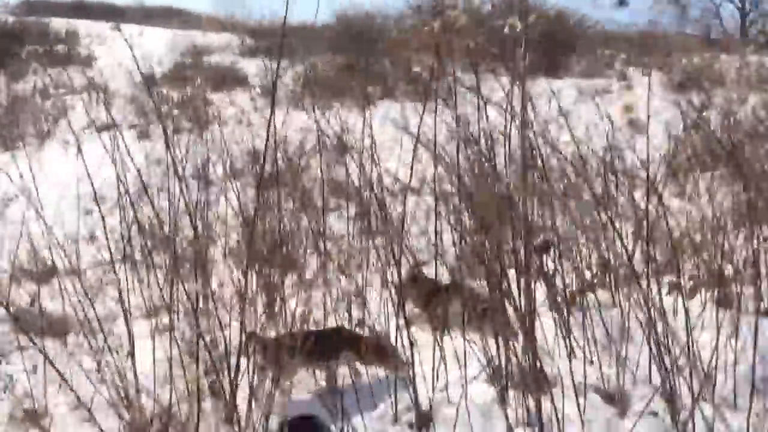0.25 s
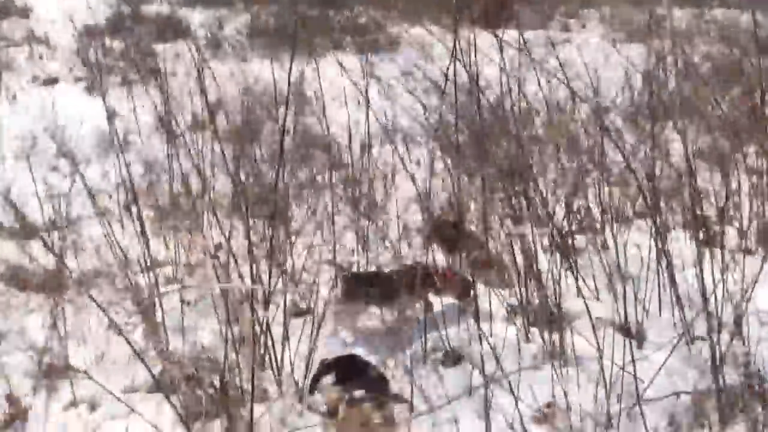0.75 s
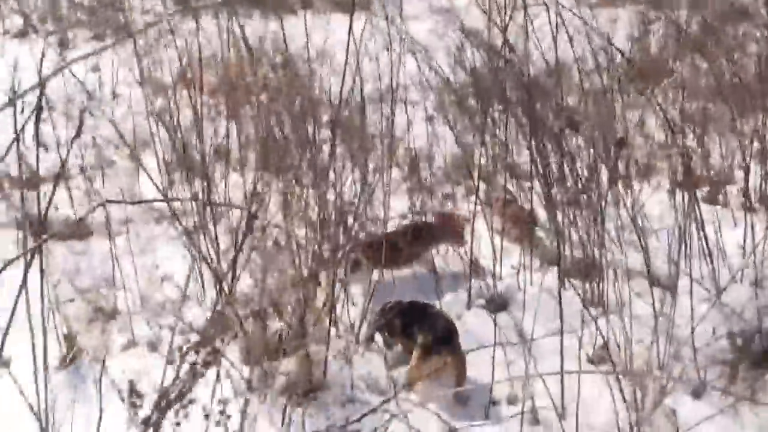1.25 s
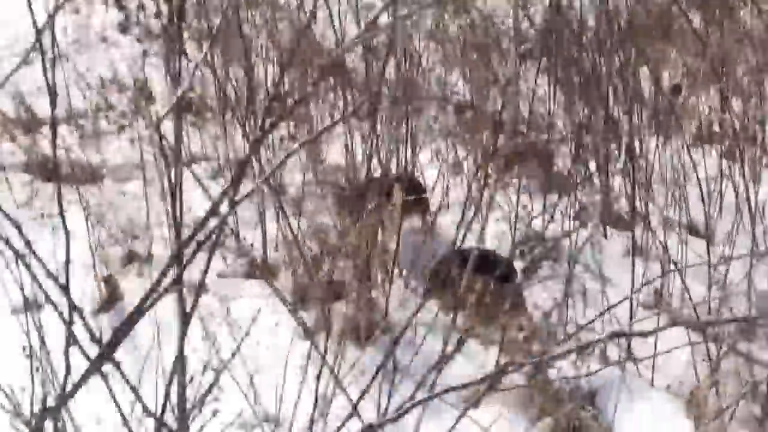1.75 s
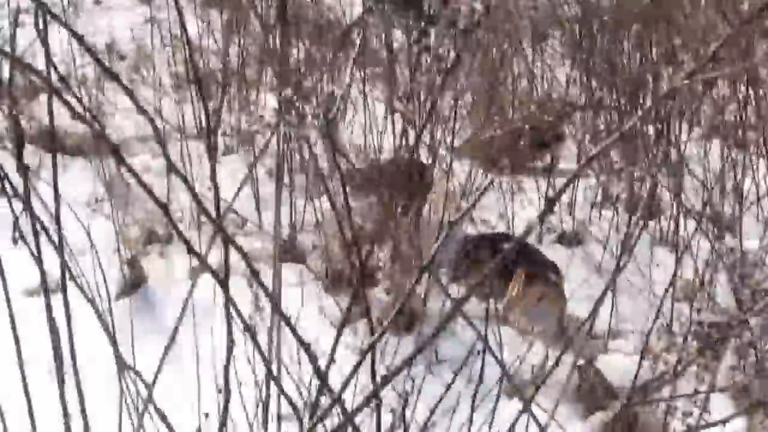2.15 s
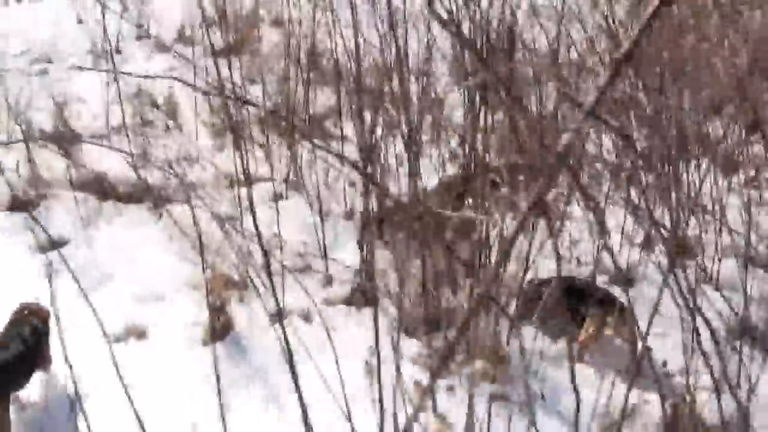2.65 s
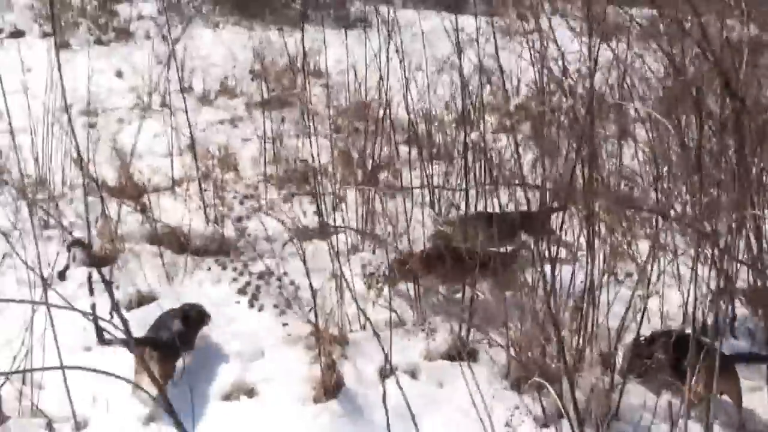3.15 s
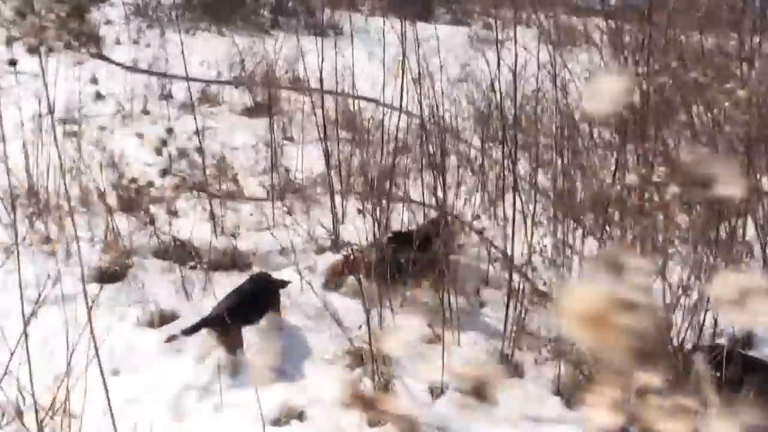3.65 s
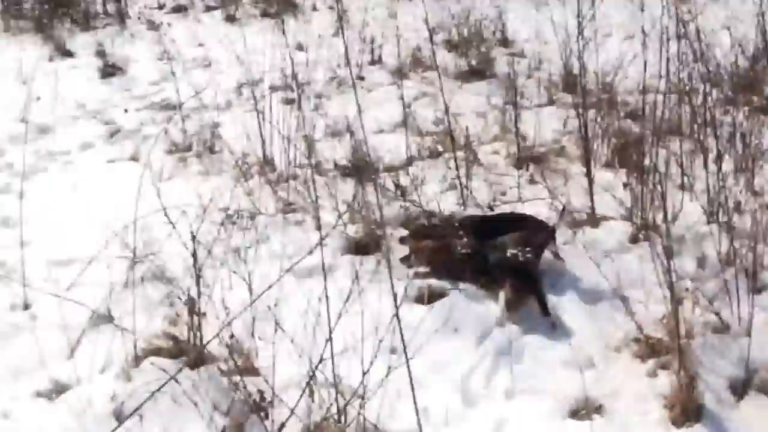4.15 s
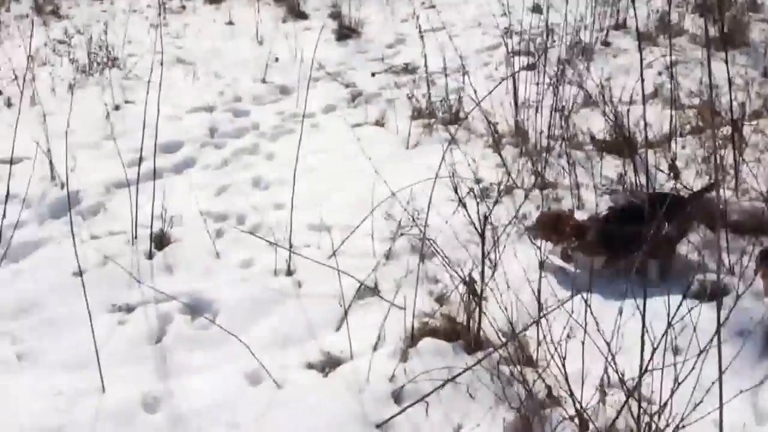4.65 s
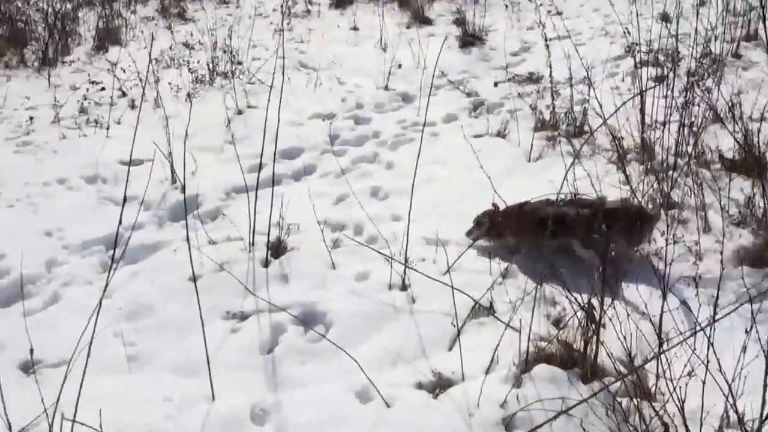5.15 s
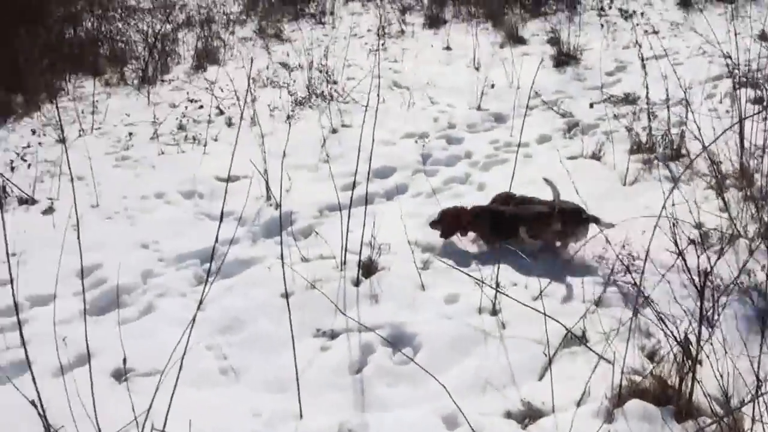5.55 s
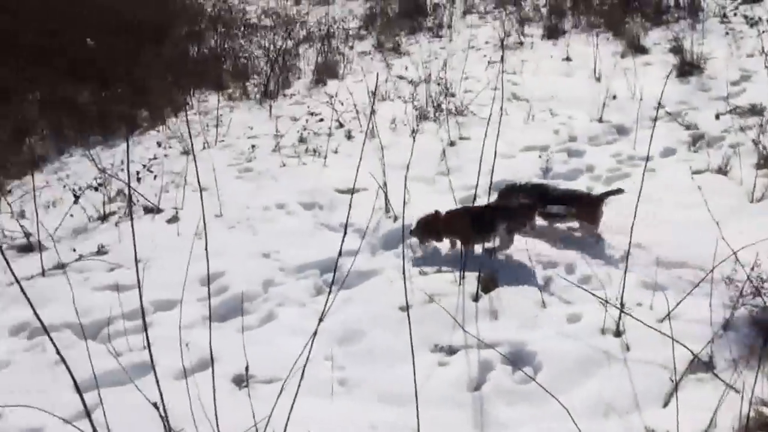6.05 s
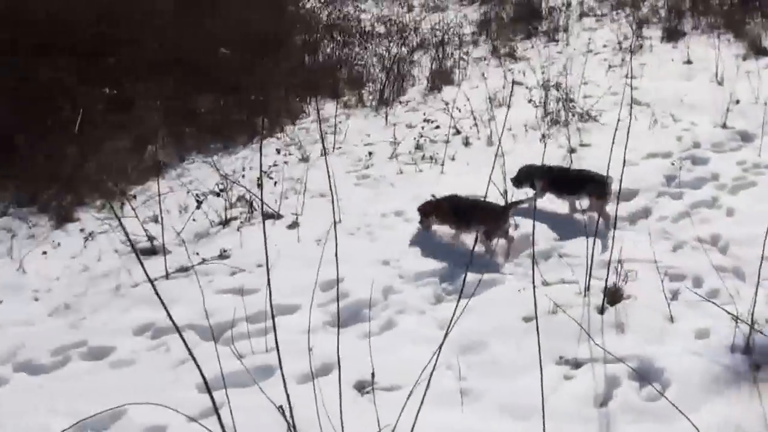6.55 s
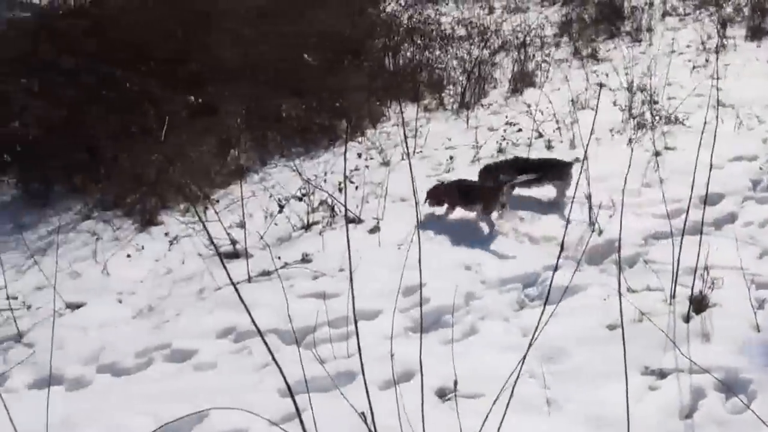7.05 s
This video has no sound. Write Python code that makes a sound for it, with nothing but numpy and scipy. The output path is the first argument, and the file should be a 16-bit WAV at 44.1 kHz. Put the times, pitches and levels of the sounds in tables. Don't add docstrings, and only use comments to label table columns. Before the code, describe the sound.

An outdoor field capture with a handheld stereo microphone: wind rumble and crackling dry stems first, then a pack of hounds baying close by. Clear ringing bays alternate with deep barks, high yelps and rough, rasping chops, pausing briefly between bursts. Sharp twig ticks and a soft knock on the microphone housing occur among them. Later cries come faster and overlap, with almost no echo, ending abruptly mid-bay.

```python
import sys
import numpy as np
from scipy import signal
from scipy.fft import rfft, irfft, next_fast_len
from scipy.io import wavfile
from scipy.ndimage import uniform_filter1d, minimum_filter1d

SR = 44100
rng = np.random.default_rng(int(sys.argv[2]) if len(sys.argv) > 2 else 0)


def to_wav(s):
    ch = np.atleast_2d(s).T
    pcm = np.round(np.clip(ch, -1, 1) * 32767)
    wavfile.write(sys.argv[1], SR, pcm.astype(np.int16))


def boost(x):
    u = np.asarray(x, float) / 20
    return 10 ** u


N = 322371

# f/Hz, level/dB per Hz
WIND_COLOUR = [(12, -36), (20, -6), (125, 0), (332, -9.5), (374, -12), (536, -15), (782, -22), (1200, -28),
               (1560, -28), (2640, -120)]
# t/s, level/dB
WIND_FORCE = [(0, -41.5), (.2, -37.5), (.7, -40), (.85, -31.5), (1.1, -33.5), (1.46, -47.5), (1.79, -41),
              (2.25, -48), (2.42, -40), (2.8, -42.5), (2.9, -52), (4.45, -37), (4.72, -59), (5.2, -55),
              (5.6, -61), (6.14, -55), (6.27, -45), (7.31, -62)]
# f/Hz, level/dB per Hz
RUSTLE_COLOUR = [(200, -6.5), (600, 0), (1500, -1), (3000, -5), (6000, -8), (8000, -10.5), (11500, -8),
                 (15500, -19.5)]
# t/s, level/dB
STEM_STIR = [(0, -48), (.2, -51.5), (.33, -44), (.7, -53.5), (.85, -48.5), (1.1, -46), (1.48, -56),
             (2.25, -59.5), (2.39, -50), (2.78, -56), (2.9, -51.5), (3.3, -55), (4.2, -46.5), (4.71, -55),
             (4.82, -47), (4.97, -54.5), (5.8, -58.5), (7.31, -61.5)]
# t/s, length/s, low f/Hz, high f/Hz, level/dB
SNORTS = [
    (0.099, 0.039, 1040, 2160, -43.5),
    (1.09, 0.11, 880, 5450, -44),
    (2.94, 0.072, 680, 5300, -42.5),
    (4.749, 0.13, 149, 1200, -43),
]

# t/s, f/Hz, effort level/dB
BAYS = [
    [(1.195, 522, -52), (1.225, 590, -26.5), (1.26, 617, -21), (1.34, 626.5, -20.5), (1.388, 675, -24),
     (1.42, 535, -56)],
    [(2.678, 622, -35.5), (2.71, 649, -24.5), (2.8, 631, -20), (2.82, 680, -32)],
    [(5.53, 612.3, -27), (5.57, 627.6, -23.5), (5.6, 595, -23), (5.65, 611.5, -27), (5.69, 676, -39)],
    [(6.022, 596, -57), (6.05, 625, -28), (6.17, 626, -27), (6.21, 649.7, -26), (6.33, 664.6, -28),
     (6.375, 708, -36.5)],
    [(6.773, 569.5, -39), (6.8, 636.4, -28), (6.85, 659, -21), (6.92, 673, -20.5), (6.945, 590, -45.5)],
    [(4.993, 480, -45), (5.012, 530, -39), (5.03, 570, -30), (5.055, 628, -27), (5.09, 605, -25),
     (5.128, 600, -24), (5.143, 520, -44)],
    [(7.25, 520, -50), (7.256, 580, -35), (7.265, 615, -32), (7.285, 610, -30), (7.305, 595, -30),
     (7.345, 595, -30)],
]
BAY_OVERTONES = (-2, 0.1, -6, -7.5, -26.5)
# brightness at start, end/dB per overtone, second overtone/dB, top overtones/dB,
# left minus right/dB
BAY_JAWS = [(1.5, .9, .5, -2.5, 6.5), (.6, .6, .3, -6, 1.5), (.9, .9, .3, .3, -5.5), (0, 2.6, 1.2, -3, -5),
            (.3, -7, -11, .3, -3.5), (.9, .9, 3, -2.5, -1.3), (1.5, -1.5, 8, 3, -6.5)]
# third at start, end/dB, fourth at start, end/dB, first gape/0-1
BAY_TONES = [(-1.5, -4, 3, 3, .9), (3, -8, .3, 6, .7), (.3, -6, 4, 2.5, .9), (.3, .3, -1.5, .3, .7),
             (-3, -4, -3, -4, .9), (11, -2.5, 9, -6, .1), (-5, -7, 5, -2.5, .1)]
# from t/s, to t/s, f/Hz, level/dB, hoarseness level/dB
RATTLES = [(1.249, 1.373, 790, -6, -50), (1.645, 1.688, 842, -9, -34), (1.802, 1.92, 780, -5.5, -12.5),
           (2.393, 2.49, 770, -18, -21), (4.208, 4.266, 800, -6, -14.5), (4.425, 4.54, 785, -7, -14),
           (4.841, 4.93, 770, -8, -20), (5.338, 5.41, 780, -3, -20), (5.598, 5.68, 770, -9, -19.5),
           (5.846, 5.92, 780, -12, -24), (5.987, 6.162, 815, -29, -21.5), (6.358, 6.441, 790, -13, -39),
           (6.811, 6.924, 790, -9.5, -24), (4.995, 5.038, 860, -4, -5), (7.296, 7.34, 880, -2, -20)]
# pitch share at the end, sideband level/dB
RATTLE_DRIFTS = [(1.01, .3), (1.01, .3), (1.01, 3), (1.01, .3), (1.01, .3), (1.01, -6), (1.12, 5),
                 (1.01, .3), (1.01, .3), (1.01, .3), (1.01, .3), (1.01, .3), (1.01, .3), (1.05, 6),
                 (1.01, .3)]
# f/Hz, level/dB
UPPER_THROAT = [(2800, -15), (3700, -27), (4300, -32), (4900, -25), (5500, -26), (6500, -33), (8000, -46.5),
                (10000, -42.5), (13000, -76)]
# f/Hz, left lead/rad
SIDE_LEAD = [(100, 5), (600, 0.86), (1200, 0.7), (2500, 0.67), (5400, 0.25), (11000, -0.5)]

# t/s, length/s, start f/Hz, end f/Hz, level/dB
SQUEAKS = [
    (1.404, 0.025, 6460, 7030, -38.5),
    (2.633, 0.049, 7000, 7000, -56),
    (5.515, 0.015, 6400, 6500, -42),
    (5.688, 0.036, 6270, 7200, -50.5),
]
# t/s, peak level/dB, f/Hz
SNAPS = [
    (1.4562, -46, 7030),
    (2.0122, -19.5, 10050),
    (3.2226, -38, 11400),
    (4.2961, -36, 10300),
    (5.465, -34, 11800),
    (5.4782, -28.5, 5930),
    (6.707, -24, 7660),
]

# t/s, f/Hz, effort level/dB
WAILS = [
    [(1.575, 650, -56), (1.6, 952, -50), (1.625, 1300, -41)],
    [(5.365, 770, -26), (5.39, 798, -13.5), (5.43, 880, -53)],
    [(5.912, 800, -50), (5.932, 705, -33), (5.955, 688, -27), (5.975, 640, -24), (5.995, 640, -26),
     (6.003, 688, -30), (6.07, 720, -31), (6.105, 668, -46)],
    [(5.98, 460, -34), (6.005, 516, -34), (6.05, 524, -27), (6.11, 587, -28), (6.15, 593, -28),
     (6.175, 490, -45)],
    [(4.393, 490, -42), (4.401, 430, -32), (4.408, 450, -20), (4.435, 505, -23), (4.46, 552, -24),
     (4.5, 578, -24), (4.526, 600, -22), (4.534, 600, -42)],
]
# overtones 1 to 5/dB, brightness at start and end/dB per overtone, left minus right/dB
WAIL_THROATS = [((0, -7, -25, -40, -45), (-1.1, 1.1), -1.3), ((3, -36, -30, -60, -57), (-2.1, -1), -2.1),
                ((-3, .3, -8, -17, -14), (3, -18), -8.5), ((-13.5, 1, -9, -17, -33), (.1, 1.1), -6),
                ((-6, 1.5, -15, -22, -16), (.6, -5), -1.5)]
WAIL_TONES = [(.3, .3, .3, .3, .1), (.3, .3, .3, .3, .1), (.3, .3, .3, .3, .1), (.3, .3, .3, .3, .1),
              (-10, 16, 3, -10, .1)]

# t/s, length/s, first f/Hz, last f/Hz, level/dB
WHINES = [
    (1.615, 0.044, 1320, 1320, -36.5),
    (2.812, 0.033, 1364, 1295, -29),
    (3.338, 0.032, 1340, 1306, -31.5),
    (3.775, 0.043, 1110, 1280, -37),
]
# (release/s, pitch share, level/dB)
WHINE_RULE = (.018, 0.88, -12), (0.0028, .99, -1.5)
# overtones 1 to 5/dB, brightness at start and end/dB per overtone
WHINE_THROAT = (0.6, -3, -17.5, -27, -23), (-2.5, .3)
# swell/dB, extra brightness/dB per overtone, top overtones/dB
WHINE_THROWS = [(8, -2.5, .3), (.3, -1.5, 9), (8.3, .3, 0.4), (2.7, -2.5, .3)]

# t/s, length/s, first held f/Hz, last held f/Hz, level/dB
BARKS = [
    (1.655, 0.11, 579, 588, -22.5),
    (2.836, .119, 599, 609.5, -20),
    (3.368, 0.11, 610, 618, -20.5),
    (3.808, .13, 606, 624.5, -20),
]
BARK_RULE = (.02, .945, -2.5), (0.022, 0.81, -17)
BARK_THROAT = (-6.5, -1.7, -8.5, -11.5, -27.5), (1.6, -2.4)
BARK_THROWS = [(1.5, -1.5, -6, -9), (1, -0.4, -1.5, -3), (-0.5, 0.5, -.5, .3), (1, 0.9, -3, 3)]
BARK_TONES = [(.3, .3, .3, .3, .1), (.3, .3, .3, .3, .1), (.6, 1.5, 1.5, -3, .1), (1.2, -3, 1.5, .3, .1)]
# t/s, left minus right level/dB
DEEP_TRACK = [(1.6, -1), (2.82, -1), (5, -1.3)]

# t/s, length/s, first held f/Hz, last held f/Hz, level/dB
CHOPS = [
    (1.745, 0.024, 761, 742, -31),
    (1.795, .12, 588, 569.6, -25),
    (2.403, 0.09, 585, 578, -23),
    (4.195, 0.071, 640, 584, -23.5),
    (4.84, .12, 559, 632, -24.5),
    (5.322, 0.094, 553, 530, -22.5),
    (5.597, 0.14, 597, 568, -25.5),
    (5.847, 0.12, 583.6, 585, -22.5),
    (6.335, 0.099, 565, 568, -23),
    (6.81, 0.1, 614, 558, -27.5),
]
CHOP_RULE = (0.0246, 0.96, -2), (.028, .62, -11.5)
CHOP_THROAT = (-7.5, 2, -14, -14.5, -35), (-0.58, 0.99)
CHOP_THROWS = [(3, -2.5, .3, -9), (-1.5, 2.5, 7, 9), (3, -1, 11, -12), (-1.5, 1.5, -3, 12),
               (-7, 1.5, -18, 13), (-8, -3, -8, 0), (11, .3, 3, -18), (4, -2.2, -12, -9), (8, -1.2, -5, .3),
               (-1, 1.5, -1.5, .3)]
CHOP_TONES = [(.3, -3, -3, -3, .1), (.3, -3, 3, .3, .3), (.3, -3, .3, .3, .1), (6, 6, 6, 3, .1),
              (2.5, -13, -1.5, .3, .1), (-2, 6, -6, 10, .1), (-2, 4, .3, -18, .1), (-2.5, -9, 13, -18, .1),
              (-5, -13, 4, -14, .1), (-4, -4, .3, .3, .1)]
# t/s, length/s, first f/Hz, last f/Hz,
# level/dB
YELPS = [(1.774, 0.027, 985, 965, -21), (2.371, .04, 1031, 944, -19.5), (4.136, 0.06, 1065, 1128, -17.5),
         (4.813, 0.041, 983, 910, -35.5), (5.29, 0.044, 888, 764, -15.5), (5.823, 0.027, 940, 874, -27),
         (6.3, 0.032, 930, 800, -26.5), (6.786, .028, 972, 970, -18.5), (4.524, 0.024, 790, 770, -36),
         (2.812, .024, 800, 880, -27), (5.133, .024, 1520, 1150, -37), (3.929, .017, 800, 730, -35)]
YELP_RULE = (.008, .92, -9), (0.0039, 0.97, 2)
YELP_THROAT = (1, -17.5, -29, -43, -40), (-1.6, 1.9)
YELP_THROWS = [(4, .3, -6), (-2, 0.7, -3), (-1, -.5, -3), (-2, 4, .3), (3, -5, -9), (6, 1, .3), (6, 0, -6),
               (3, 0.5, -3), (-6, 6, -6), (3, -4, -6), (-7, -4, -6), (-4, 5, -12)]
# t/s, left minus right level/dB
HOARSE_TRACK = [(1.7, -1), (4.2, -1), (4.9, -2.8), (5.6, -1), (6.8, -5.5), (7.3, -6.5)]

# t/s, peak level/dB, f/Hz
KNOCK = (5.271, -21, 230)


def evened(x):
    return x / np.sqrt(np.mean(x ** 2) + 1e-20)


def read(points, hz):
    f, value = np.transpose(points)
    return np.interp(np.log(hz + 1), np.log(f + 1), value)


def follow(points, t):
    return np.interp(t, *np.transpose(points))


def add(mix, s, sound):
    part = mix[:, round(s * SR):][:, :sound.shape[1]]
    part += sound[:, :part.shape[1]]


def band(x, low_hz, high_hz):
    sos = signal.butter(3, [low_hz, high_hz], "band", fs=SR, output="sos")
    return evened(signal.sosfilt(sos, x))


def hiss(n, low_hz, high_hz):
    return band(rng.standard_normal(n), low_hz, high_hz)


def wander(n, hz):
    b, a = signal.butter(2, hz, fs=SR)
    return evened(signal.lfilter(b, a, rng.standard_normal(n + 2000))[2000:])


def glide(t, hz, rate):
    return 2 * np.pi * np.cumsum(hz * (1 + rate)) / SR


def noise(spectrum, same, patchy_db, gusty_db, size):
    frames, hz = 4 * N // size + 5, np.fft.rfftfreq(size, 1 / SR)
    a, b, c, d, patches = rng.standard_normal((frames, len(hz), 5)).T
    patches = uniform_filter1d(patches, 6, 0)
    patches = evened(uniform_filter1d(patches, 8, 1))
    gusts = evened(uniform_filter1d(rng.standard_normal(frames), 4))
    same = np.clip(read(same, hz), 0, 1)[:, None]
    left = a + 1j * b
    right = same * left + np.sqrt(1 - same ** 2) * (c + 1j * d)
    level_db = read(spectrum, hz)[:, None] + patchy_db * patches + gusty_db * gusts
    z = np.array([left, right]) * boost(level_db)
    return evened(signal.istft(z, nperseg=size, noverlap=3 * size // 4)[1][:, :N])


def wind():
    likeness = [(25, 0.75), (70, 0.23), (200, 0.33)]
    buffet = noise(WIND_COLOUR, likeness, patchy_db=1.5, gusty_db=2.5, size=1024)
    force_db = follow(WIND_FORCE, np.arange(N) / SR) + 3.0
    return buffet * boost(force_db + np.array([[.7], [-.7]]))


def brush():
    likeness = [(600, 0.82), (9000, 0.65), (12000, 0.88)]
    rustle = noise(RUSTLE_COLOUR, likeness, patchy_db=3.0, gusty_db=1.2, size=256)
    struck = rng.random(N) < 400. / SR
    force = boost(2.0 * np.minimum(rng.exponential(1, N), 4))
    ticks = struck * force * rng.choice([-1., 1.], N)
    crackle = band(ticks, 1540.0, 10900.0)
    return (rustle + 0.3 * crackle) * boost(follow(STEM_STIR, np.arange(N) / SR) + 7.0)


def snorts():
    out = np.zeros((1, N))
    for s, length, low_hz, high_hz, db in SNORTS:
        u = np.arange(0, 1, 1 / (length * SR))
        throb = np.sqrt(np.sin(np.pi * u)) * boost(3.1 * wander(len(u), 65.0))
        add(out, s, (boost(db) * throb * hiss(len(u), low_hz, high_hz))[None])
    return out


def second_vibration(s, starts, t, catch):
    hz, sides_db = 860., 0
    strength = boost(-36.0) + boost(-8.5) * catch
    hoarse = boost(-39.5) + boost(-11.0) * catch
    for (t0, t1, rattle_hz, rattle_db, hoarse_db), (drift, lines_db) in zip(RATTLES, RATTLE_DRIFTS):
        if s[0] == starts[np.argmin(abs(starts - t0))]:
            on = np.clip(np.minimum(t - t0, t1 - t) / 0.012, 0, 1)
            progress = np.clip((t - t0) / (t1 - t0), 0, 1)
            hz, sides_db = rattle_hz * drift ** (progress ** 2), lines_db
            strength = strength + on * boost(rattle_db)
            hoarse = hoarse + on * boost(hoarse_db)
    return hz, strength, hoarse, sides_db


def throat_db(voice, mouth, balance, s, t, hz, chest_voice, catch):
    k = np.arange(1, 20)[:, None]
    low = k[:5]
    strongest = np.argmax(voice[:5]) + 1
    progress = (t - s[0]) / (s[-1] - s[0])
    bright_db = 1.16 * catch + mouth[0] + (mouth[1] - mouth[0]) * progress ** 1.1
    low_db = np.array(voice[:5])[:, None] + (low - strongest) * bright_db
    third_start, third_end, fourth_start, fourth_end, gape = balance
    late = progress ** 1.6
    odd_db = third_start + (third_end - third_start) * late
    fourth_db = fourth_start + (fourth_end - fourth_start) * late
    low_db += np.array([.6 * np.minimum(odd_db, 0), 0 * t, odd_db, fourth_db, .4 * odd_db])
    gape_db = np.array([0, 0, 8, -7, 20])[:, None]
    low_db += gape * gape_db * np.exp(-((t - s[0]) / .045) ** 3)
    low_db -= 0.18 * np.maximum(540. - low * hz, 0)
    opening = np.exp(-((t - s[0]) / 0.028) ** 2) * chest_voice
    low_db += opening * sum(5.2 / (1 + ((low * hz - f) / 230.0) ** 2) for f in (1680., 2950.))
    sag = np.maximum(abs(np.median(hz) / hz - 1) - .05, 0) * (t > s.mean())
    low_db -= 45 * sag * np.maximum(low - strongest, 0)
    high_db = read(UPPER_THROAT, k[5:] * hz) + 0.4 * (low_db[4] + 5.5) - 60 * sag
    return np.r_[low_db, high_db]


def rattle_lines(beat, phase, strength, sides_db):
    lines = [beat, beat + phase, beat + 2 * phase, beat + 3 * phase,
             3 * phase - beat, 4 * phase - beat, 5 * phase - beat]
    shares = [0.98, *boost(sides_db) * np.array([0.28, 0.21, 0.12, 0.28, 0.095, 0.23])]
    total = 0
    for line, share in zip(lines, shares):
        flutter = boost(3.9 * wander(len(phase), 54.0))
        total = total + share * flutter * np.cos(line + 2 * np.pi * rng.random())
    return strength * total


def throat_breath(hoarse, catch, grain):
    n = len(catch)
    leak = (boost(-53.0) + 0.14 * hoarse) * boost(4. * grain[0]) * hiss(n, 3600., 5600.)
    onset = boost(-15.5) * catch * hiss(n, 800., 3500.0)
    rasp = boost(-17.) * hoarse * boost(4.6 * grain[1]) * hiss(n, 1500., 3400.)
    return leak + onset + rasp


def cry(rows, voice, mouth, balance, starts):
    s, hz, level_db = np.transpose(rows)
    t = np.arange(s[0], s[-1], 1 / SR)
    n = len(t)
    hz = uniform_filter1d(np.interp(t, s, hz), 300, mode="nearest")
    swell, dying = np.interp(t, s, boost(level_db)), boost(np.interp(t, s, level_db))
    level = np.where(t < s[1], swell, dying)
    chest_voice = np.median(hz) < 790
    catch = np.exp(-(t - s[0]) / .014) * chest_voice
    second_hz, strength, hoarse, sides_db = second_vibration(s, starts, t, catch)
    phase = glide(t, hz, (0.0033 + 0.058 * hoarse) * wander(n, 58.6))
    k = np.arange(1, 20)[:, None]
    colour_db = throat_db(voice, mouth, balance, s, t, hz, chest_voice, catch)
    flutter_db = (0.5 + 0.26 * k) * np.array([wander(n, 32.5) for _ in k])
    grain = np.array([wander(n, 220.0) for _ in range(5)])[(k[:, 0] - 1) % 5]
    heights = boost(colour_db + flutter_db) * (1 + hoarse * np.sqrt(k) * grain)
    stack = (heights * np.cos(k * phase + 1.3 * k ** 2)).sum(0)
    beat = glide(t, second_hz, 0.0258 * wander(n, 49.0))
    rattle = rattle_lines(beat, phase, strength, sides_db)
    breath = throat_breath(hoarse, catch, grain)
    edge = np.clip(np.minimum(t - s[0], s[-1] - t) / 0.0044, 0, 1)
    sound = np.sqrt(2) * level * edge * (stack + rattle + breath)
    return sound * boost(np.array([[.5], [-.5]]) * voice[5])


def bays():
    out = []
    for rows, (*jaw, second_db, top_db, side_db), balance in zip(BAYS, BAY_JAWS, BAY_TONES):
        tones = np.add(BAY_OVERTONES, [0, second_db, 0, 0, top_db])
        out.append((rows, (*tones, side_db), jaw, balance))
    return out


def wails():
    return [(rows, (*tones, side_db), jaw, balance)
            for rows, (tones, jaw, side_db), balance in zip(WAILS, WAIL_THROATS, WAIL_TONES)]


def by_rule(row, swell_db, tail_db, rule):
    start, length, first_hz, last_hz, db = row
    (rise, scoop, from_db), (fall, sag, to_db) = rule
    rise, fall = min(rise, .6 * length), min(fall, .3 * length)
    first_db, last_db = db - swell_db / 2, db + swell_db / 2
    return [(start, scoop * first_hz, first_db + from_db),
            (start + rise, first_hz, first_db),
            (start + length - fall, last_hz, last_db),
            (start + length, sag * last_hz, last_db + to_db + tail_db)]


def short_cries(table, throws, balances, rule, throat, track):
    tones, jaw = throat
    out = []
    for row, (swell_db, bright_db, top_db, *tail_db), balance in zip(table, throws, balances):
        voice = (*tones[:4], tones[4] + top_db, follow(track, row[0]))
        out.append((by_rule(row, swell_db, sum(tail_db), rule), voice, np.add(jaw, bright_db), balance))
    return out


def all_cries():
    plain = [(0, 0, 0, 0, 0)] * 12
    return (bays() + wails()
            + short_cries(WHINES, WHINE_THROWS, plain, WHINE_RULE, WHINE_THROAT, DEEP_TRACK)
            + short_cries(BARKS, BARK_THROWS, BARK_TONES, BARK_RULE, BARK_THROAT, DEEP_TRACK)
            + short_cries(CHOPS, CHOP_THROWS, CHOP_TONES, CHOP_RULE, CHOP_THROAT, HOARSE_TRACK)
            + short_cries(YELPS, YELP_THROWS, plain, YELP_RULE, YELP_THROAT, HOARSE_TRACK))


def pack():
    out = np.zeros((2, N))
    cries = all_cries()
    starts = np.array([rows[0][0] for rows, *_ in cries])
    for rows, *throat in cries:
        add(out, rows[0][0], cry(rows, *throat, starts))
    t = np.arange(SR // 2) / SR
    tail = rng.standard_normal((2, len(t))) * boost(-60 * t / 0.24) * (t > .01)
    tail /= np.linalg.norm(tail[0])
    out = out + boost(-27.0) * signal.fftconvolve(out, tail, axes=1)[:, :N]
    size = next_fast_len(N)
    turn = read(SIDE_LEAD, np.fft.rfftfreq(size, 1 / SR)) * np.array([[.5], [-.5]])
    return 1.302 * irfft(rfft(out, size) * np.exp(1j * turn), size)[:, :N]


def squeaks():
    out = np.zeros((1, N))
    for s, length, from_hz, to_hz, db in SQUEAKS:
        u = np.arange(0, 1, 1 / (length * SR))
        tone = np.sin(2 * np.pi * np.cumsum(from_hz + (to_hz - from_hz) * u) / SR)
        rough = boost(db + 6.1 * wander(len(u), 300.))
        add(out, s, (rough * np.sqrt(np.sin(np.pi * u)) * tone)[None])
    return out


def snaps():
    out, t = np.zeros((1, N)), np.arange(2000) / SR
    for s, db, hz in SNAPS:
        crack = boost(-60 * t / 0.0062) * np.sin(2 * np.pi * hz * t)
        decay = 0.62 * boost(-60 * t / 0.007) + 0.09 * boost(-60 * t / .055)
        scatter = np.diff(rng.standard_normal(len(t) + 1)) * decay
        add(out, s + 0.0011, (boost(db) * (crack + scatter))[None])
    return out


def knock():
    out = np.zeros((1, N))
    s, db, hz = KNOCK
    u = np.arange(-400, 400) / SR
    thump = np.cos(2 * np.pi * hz * u) * np.exp(-(u / 0.0036) ** 2) * (u > -.75 / hz)
    add(out, s - 400 / SR, (boost(db) * thump)[None])
    return out


def scene():
    small = snorts() + squeaks() + snaps() + knock()
    return wind() + brush() + pack() + boost(np.array([[-.6], [.6]])) * small


def low_pass(x):
    return signal.sosfilt(signal.butter(12, 16490, fs=SR, output="sos"), x)


def record(dry):
    peak_db = 20 * np.log10(-minimum_filter1d(-abs(dry).max(0), 150) + 1e-6)
    fall = np.arange(N) * 240.0 / SR
    held_peak_db = np.maximum.accumulate(peak_db + fall) - fall
    over_db = np.maximum(held_peak_db + 10., 0)
    held = dry / boost(.75 * uniform_filter1d(over_db, 100))
    edge = signal.firwin(511, 15650, window=("kaiser", 9), fs=SR)
    mix = signal.oaconvolve(held, edge[None], "same")
    return low_pass(mix)


dry = scene()
out = record(dry)
to_wav(out)
```